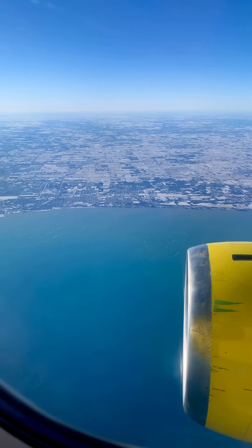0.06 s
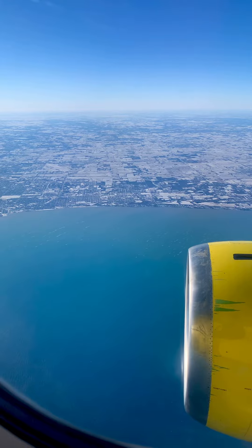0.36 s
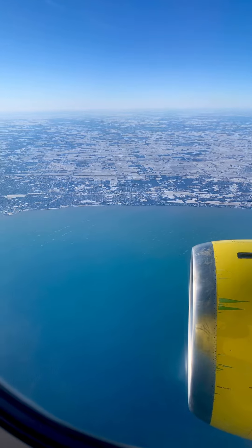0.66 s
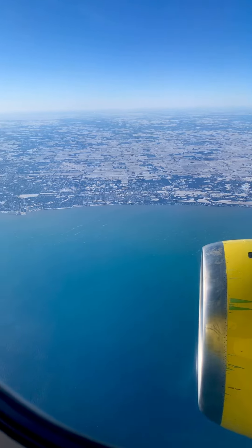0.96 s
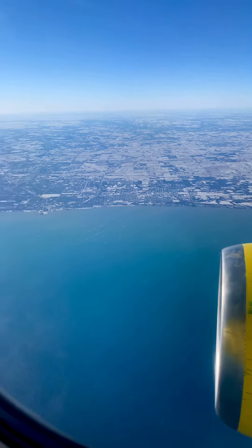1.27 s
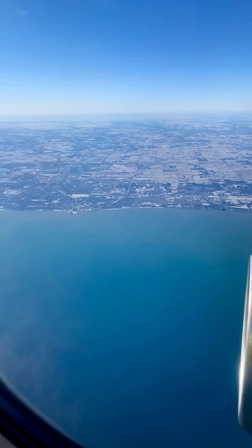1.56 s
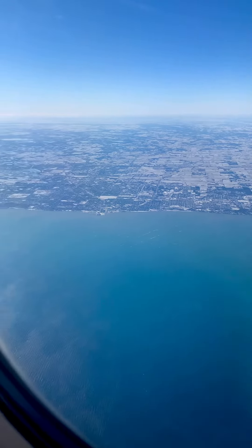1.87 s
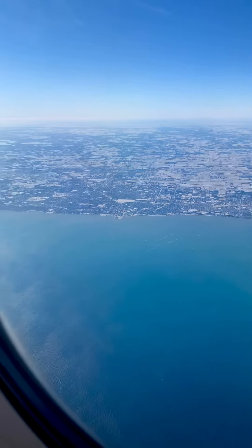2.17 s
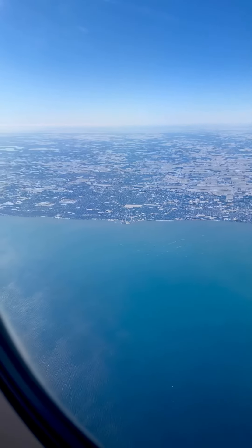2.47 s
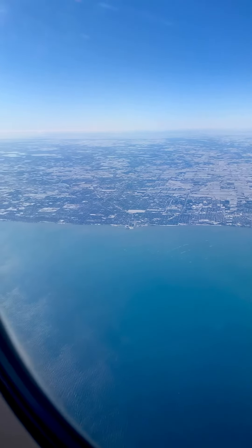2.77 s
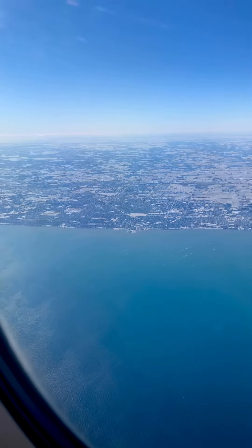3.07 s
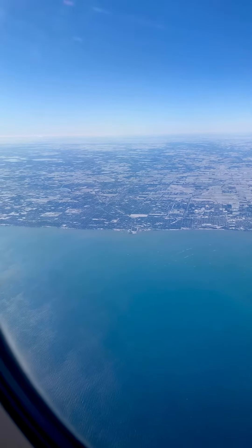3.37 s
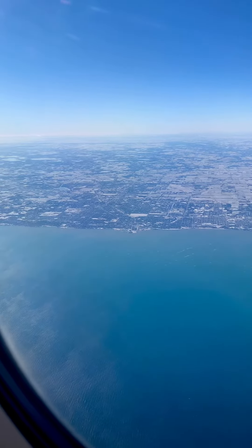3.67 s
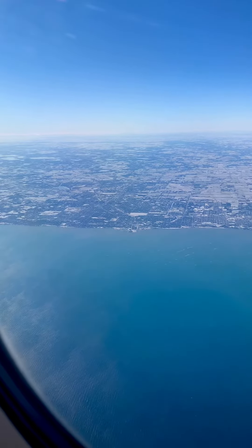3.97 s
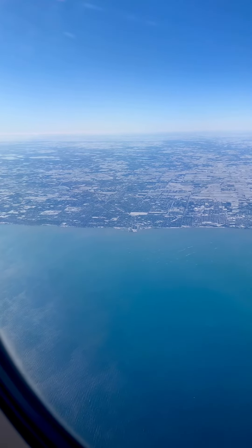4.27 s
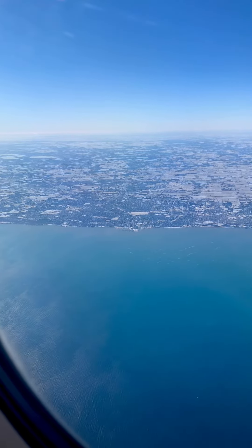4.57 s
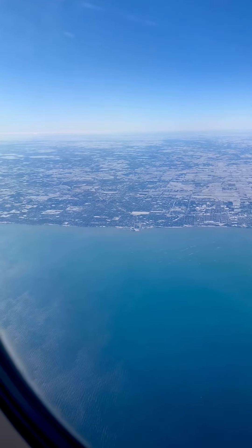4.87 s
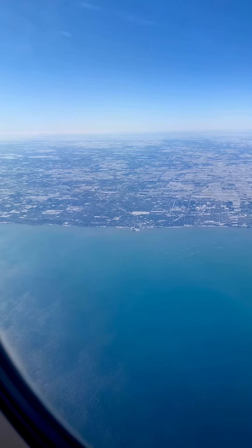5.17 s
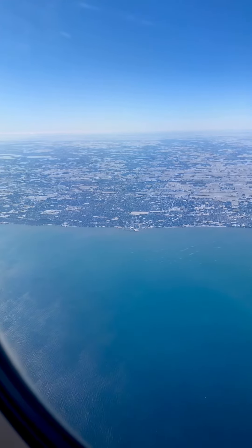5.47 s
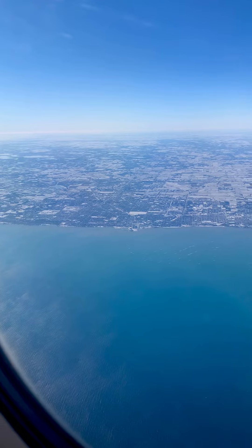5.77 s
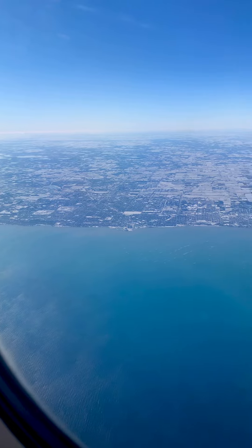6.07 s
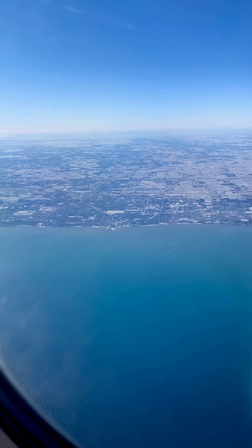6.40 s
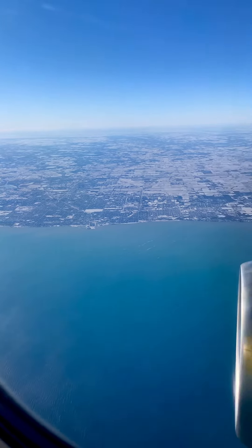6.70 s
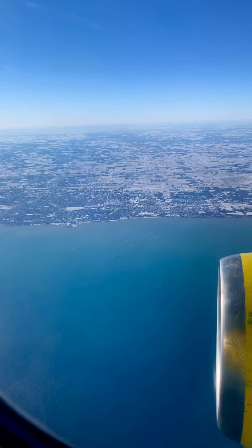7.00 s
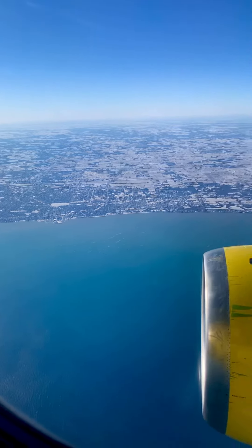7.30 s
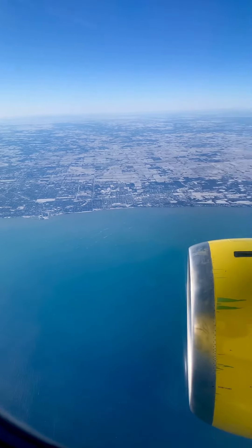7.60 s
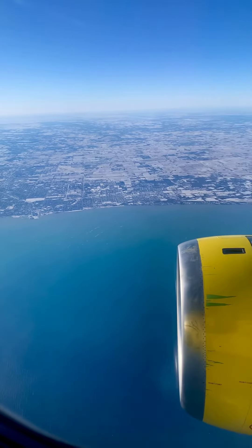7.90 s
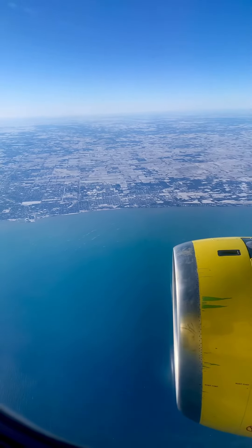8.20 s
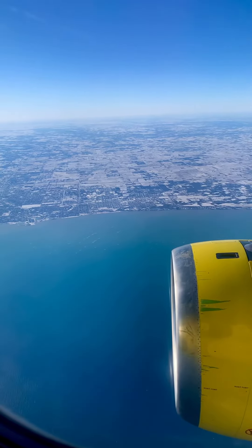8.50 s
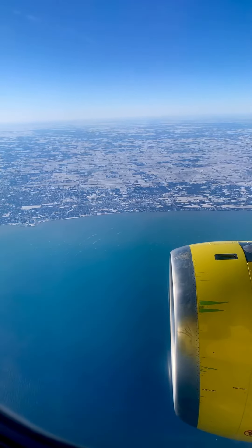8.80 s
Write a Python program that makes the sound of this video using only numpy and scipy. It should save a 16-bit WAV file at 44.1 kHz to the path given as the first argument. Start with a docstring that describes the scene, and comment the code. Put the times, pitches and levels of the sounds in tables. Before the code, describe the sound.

A steady low rumble and slowly pulsing engine hum fill an airliner in flight, under a thin whine and soft vent hiss.

```python
"""Window seat in a cruising airliner

Two engine fans spin at almost the same speed, so their tones beat (swell and fade): the low drone
slowly, the high blade whine fast. Air rumbles and rushes along the hull, the vents hiss, and something
rustles faintly nearby. It is all heard through the two microphones of a slowly turning phone."""
import sys
import numpy as np
from scipy import signal
from scipy.fft import rfft, irfft, next_fast_len
from scipy.io import wavfile
from scipy.ndimage import uniform_filter1d, minimum_filter1d, map_coordinates

SR = 44100
rng = np.random.default_rng(int(sys.argv[2]) if len(sys.argv) > 2 else 0)


def file_out(sig):
    """Save sig as 16-bit WAV at sys.argv[1]."""
    # one column per channel
    cols = np.atleast_2d(sig).T
    # limit, then scale
    lim = np.clip(cols, -1, 1)
    pcm = np.round(lim * 32767).astype(np.int16)
    wavfile.write(sys.argv[1], SR, pcm)


N = 390285
TIME_S = np.arange(N) / SR


# The engines' low tones. A harmonic is a multiple of the fan's spin rate; a lull is a beat's low point.
# Columns: harmonic, near_level_db, far_level_db, lull_s, left_lead_rad, left_louder_db
DRONE_TONES = [(1, -17.3, -28.1, 3.3, -.35, .4), (3, -36.5, -27.5, 6.75, .1, .5),
               (4, -27.6, -33.7, 4.55, .1, 3), (5, -19.4, -35.5, 3.35, -.6, .5)]

def drone(near, far, waver_db):
    """Both engines shake the hull with the same harmonics; the higher ones beat faster."""
    out = np.zeros((2, N))
    for harmonic, near_db, far_db, lull_s, lead, left_louder_db in DRONE_TONES:
        k = round(harmonic)
        slip = np.interp(lull_s, TIME_S, far - near)  # lines the fans up, so the tones oppose at lull_s
        phase = rng.uniform(0, 2 * np.pi)
        near_tone = tone(k * near + phase, lead)
        far_tone = amp(far_db - near_db) * tone(k * (far - slip) + phase, lead)
        waver = waver_db * np.sqrt(k) * wobble(5.8)  # shorter waves waver more
        balance = amp([[left_louder_db / 2], [-left_louder_db / 2]])
        out += (near_tone - far_tone) * balance * amp(near_db + waver)
    return out


# How much faster the far fan spins; it wanders as it is adjusted toward the near fan's speed.
# Columns: time_s, faster_hz
FAR_FAN_EXTRA_SPEED = [(0, .2), (.8, .18), (2.5, .163), (3.1, .122), (4, .11), (4.7, .147), (5.45, .1),
                       (5.9, .096), (6.45, .12), (7.1, .108), (7.5, .127), (8, .118), (8.85, .131)]

def fan_angles(spin_hz, slowing_hz_per_s):
    """How far the near and the far fan have turned, in radians, as both slow very slightly."""
    near_hz = spin_hz - slowing_hz_per_s * TIME_S
    far_hz = near_hz + curves(FAR_FAN_EXTRA_SPEED)[0]
    return 2 * np.pi * np.cumsum([near_hz, far_hz], axis=1) / SR


# Each engine's whine as it reaches the moving phone.
# Columns: time_s, left_db, right_db, left_lead_rad
NEAR_BLADE_TONE = [(.2, -46, -40.5, -1.45), (.8, -48, -40, -1.45), (1.25, -44.5, -44, .1),
                   (1.75, -40.5, -43, .8), (3, -37, -39, 1.2), (5.7, -35.5, -37.5, 1.55),
                   (6.3, -35.5, -40.5, 1.5), (7.25, -34.7, -52, 2.3), (7.75, -36, -52, 4.2),
                   (8.5, -36.5, -48.5, 4.3)]
FAR_BLADE_TONE = [(.2, -39.5, -42.5, 1.4), (1.2, -40, -42.5, 1.4), (1.8, -44.5, -44.5, .7),
                  (3.1, -43.5, -42.7, .7), (4.6, -44.3, -43, .8), (6.2, -41.3, -40.2, .8),
                  (7.2, -42.2, -38, 1.85), (8.8, -43.5, -39, 2.8)]

def blade_whine(near, far, blades, lull_s, waver_db):
    """Passing blades make two beating tones, each with its own pattern of loud spots in the cabin."""
    slip = np.interp(lull_s, TIME_S, far - near)
    near_angle = blades * near
    far_angle = blades * (far - slip) + np.pi  # opposite to the near tone at lull_s
    phase = rng.uniform(0, 2 * np.pi)
    out = np.zeros((2, N))
    for angle, heard in (near_angle, NEAR_BLADE_TONE), (far_angle, FAR_BLADE_TONE):
        left_db, right_db, lead = curves(heard)
        level_db = np.array([left_db, right_db]) + waver_db * wobble(8.2)
        out += tone(angle + phase, lead) * amp(level_db)
    return out


# The weak tones that make up the engines' buzz. Columns: harmonic, near_level_db, left_lead_rad
BUZZ_TONES = [(2, -33.5, -.9), (6, -36.3, -.3), (7, -42.5, 2.8), (8, -47.3, 1.2), (9, -50.5, -.6),
              (10, -50.5, 2.8), (12, -56, 2.7), (13, -46.3, -2.9), (15, -49.3, .5), (17, -55.5, 2.9),
              (18, -49.8, -1.3), (19, -49.3, -.7), (20, -55.3, 1.2), (21, -53.3, 1), (23, -57.8, 2.2),
              (24, -54.5, 2.5), (26, -57.2, 1.6), (27, -56.7, 2.3), (33, -64.3, 2), (34, -61.3, 1.8),
              (36, -66.5, .2), (38, -65.7, 1.1), (41, -65.6, 1.8), (44, -67.5, 1.2)]

def fan_buzz(near, far, far_gain_db, waver_db, blur_rad):
    """Unequal shock waves on the fan blades buzz; churning air on the way blurs the tones."""
    out = np.zeros((2, N))
    for harmonic, level_db, lead in BUZZ_TONES:
        k = round(harmonic)
        near_phase, far_phase = rng.uniform(0, 2 * np.pi, size=2)
        near_tone = tone(k * near + near_phase + blur_rad * wobble(14), lead)
        far_tone = tone(k * far + far_phase + blur_rad * wobble(13), lead)
        out += amp(level_db + waver_db * wobble(4.7)) * (near_tone + amp(far_gain_db) * far_tone)
    return out


# How strong the rumble is at each pitch. Columns: pitch_hz, relative_level_db
RUMBLE_SPECTRUM = [(15, -30.5), (30, -19), (42, -8.5), (57, 2.5), (76, -3), (100, 0), (150, -1.2),
                   (210, -3), (270, -4), (335, -3), (420, -7), (480, -4), (530, -11.5), (575, -31.5),
                   (900, -64.5)]

def hull_rumble(level_db):
    """Engine exhaust and the air dragging along the plane shake the hull."""
    return amp(level_db) * air_noise(RUMBLE_SPECTRUM, patchy_db=.3)


# How strong the rush is at each pitch. Columns: pitch_hz, relative_level_db
RUSH_SPECTRUM = [(300, -20.5), (560, 3.5), (680, 1.5), (820, 2.5), (920, 0), (1040, 1.5), (1250, -0.5),
                 (1380, -4.5), (1650, -7), (1830, -9.5), (2000, -11), (2400, -18), (3100, -20.5),
                 (4000, -22), (6000, -54)]

def air_rush(turned, start_db, rise_db_per_s, shaded_above_hz, turned_gain_db):
    """Air rushes along the hull and slowly swells; the phone's body shades the treble less when turned."""
    rush = air_noise(RUSH_SPECTRUM, patchy_db=1.8)
    treble = filtered(rush, lambda hz: 1 - flat_top(hz / shaded_above_hz))
    extra_treble = treble * (amp(turned_gain_db * turned) - 1)
    return amp(start_db + rise_db_per_s * TIME_S) * (rush + extra_treble)


# How strong the hiss is at each pitch. Columns: pitch_hz, relative_level_db
VENT_SPECTRUM = [(2000, -17.5), (4300, -8.5), (5200, 2), (6700, 6), (7800, 0), (8900, -3.5), (11000, -6.5),
                 (12500, -12.5), (15500, -16.5)]

def vent_hiss(turned, level_db, turned_gain_db, flicker_db):
    """Air hisses out of the vents, a little softer while the phone is turned away."""
    gain = amp(level_db + turned_gain_db * turned + flicker_db * wobble(16))
    return gain * air_noise(VENT_SPECTRUM, patchy_db=2.0)


# Faint rustles and ticks nearby. Columns: peak_s, level_db, pitch_hz, half_length_s
RUSTLE_PUFFS = [(.727, -51, 4800, .002), (.8045, -37.5, 3000, .002), (3.34, -57, 8430, 0.029),
                (4.612, -51, 4600, .003), (6.81, -57, 4600, .04), (8.253, -57, 9530, 0.044)]

def rustles(width_octaves):
    """Small, soft puffs of high noise; the shortest sound like ticks."""
    out = np.zeros(N)
    for peak_s, level_db, pitch_hz, half_length_s in RUSTLE_PUFFS:
        noise = rng.standard_normal(N)
        band = filtered(noise, lambda hz: bell(np.log2((hz + 1) / pitch_hz) / width_octaves))
        out += amp(level_db) * unit(band) * bell((TIME_S - peak_s) / half_length_s)
    return at_microphones(out)


def standing_wave(sound, turned_back, centre_hz, narrow_hz, wide_hz):
    """Near a standing wave's quiet spot, one band is weaker and the microphones hear it out of step."""
    narrow = filtered(sound, lambda hz: flat_top((hz - centre_hz) / narrow_hz))
    wide = filtered(sound, lambda hz: flat_top((hz - centre_hz) / wide_hz))
    wide_share = .55 * (1 - ease(start_s=.35, length_s=.7))  # the band narrows as the phone moves off
    band = narrow + wide_share * (wide - narrow)
    in_spot = 1 - ease(start_s=2.3, length_s=1.58)
    in_spot_rad, clear_rad = 2.85, -.37  # how far the right microphone is ahead of the left
    shift = np.outer([-.5, .5], clear_rad + (in_spot_rad - clear_rad) * in_spot)
    quarter_cycle_late = filtered(band, lambda hz: -1j)
    shifted = band * np.cos(shift) - quarter_cycle_late * np.sin(shift)
    band_db = -1 * in_spot - 2.2 * turned_back
    return sound - band + amp(band_db) * shifted


# How alike air noise is at the two microphones. Columns: pitch_hz, likeness (0 to 1)
MIC_LIKENESS = [(30, 0.79), (55, 0.99), (100, 1), (180, 0.89), (300, 0.89), (510, .8), (570, 0.075),
                (680, 0.22), (800, 0.43), (900, 0.33), (1000, 0.79), (1150, 0.12), (1500, 0.037),
                (1950, 0.63), (2900, 0.13), (4500, 1), (9000, 1), (14000, 0.92)]

def air_noise(spectrum, patchy_db):
    """Churning air: stereo noise of strength 1, with random louder and softer patches."""
    def shape(hz):
        split = np.arccos(np.clip(at_pitch(MIC_LIKENESS, hz), 0, 1)) / 2
        return amp(at_pitch(spectrum, hz)) * [np.cos(split), np.sin(split)]

    grid = signal.stft(rng.standard_normal((2, N)), nperseg=1024)[2]
    patches = uniform_filter1d(rng.standard_normal(grid.shape[1:]), size=6, axis=0)  # smooth over pitch
    patches = uniform_filter1d(patches, size=8, axis=1)  # and over time
    noise = signal.istft(grid * amp(patchy_db * unit(patches)), nperseg=1024)[1][:, :N]
    shared, opposed = filtered(noise, shape)
    return unit(at_microphones(np.array([shared + opposed, shared - opposed])))


# How far the left microphone is ahead of the right. Columns: pitch_hz, left_lead_rad
MIC_LEAD = [(60, -.1), (100, -.35), (170, -.45), (300, -.15), (510, -.75), (650, -2.5), (780, -2.8),
            (1050, -2.3), (1700, -4.1), (2400, -3.4), (3300, -4.7), (4700, -3.1), (6900, 0), (8900, 3.1),
            (11000, 6.3), (15000, 12.6)]

def at_microphones(sound):
    """Sound reaches one microphone slightly before the other."""
    return filtered(sound, lambda hz: np.exp(.5j * np.outer([1, -1], at_pitch(MIC_LEAD, hz))))


def tone(angle, lead):
    """A pure stereo tone of strength 1, with the left side ahead by lead radians."""
    return np.sqrt(2) * np.sin(angle + np.outer([.5, -.5], lead))


def amp(db):
    """Turn decibels into a gain to multiply by."""
    return 10 ** (np.asarray(db) / 20)


def unit(x):
    """Scale x to an average strength (rms) of 1."""
    return x / np.sqrt(np.mean(np.abs(x) ** 2) + 1e-20)


def at_pitch(table, hz):
    """Read a table of (pitch_hz, value) rows at any pitch, on a log scale."""
    pitches, values = np.transpose(table)
    return np.interp(np.log(hz + 1), np.log(pitches + 1), values)


def curves(table):
    """Turn each column after the time into one value per sample."""
    times, *columns = np.transpose(table)
    return [np.interp(TIME_S, times, column) for column in columns]


def wobble(rate_hz):
    """A smooth curve through rate_hz random values a second."""
    coarse = np.linspace(0, N, num=2000)
    values = rng.standard_normal(size=600)
    smooth = map_coordinates(values, [coarse * rate_hz / SR], mode="wrap")
    return np.interp(np.arange(N), coarse, smooth)


def ease(start_s, length_s):
    """A smooth move from 0 to 1."""
    return (1 - np.cos(np.pi * np.clip((TIME_S - start_s) / length_s, 0, 1))) / 2


def bell(x):
    """A rounded bump, highest at x = 0."""
    return np.exp(-x ** 2)


def flat_top(x):
    """Near 1 around x = 0, falling steeply through a half at -1 and 1."""
    return 1 / (1 + x ** 8)


def filtered(sound, response):
    """Multiply each pitch in the sound by response(hz)."""
    size = next_fast_len(N + SR // 2)
    hz = np.fft.rfftfreq(size, 1 / SR)
    return irfft(rfft(sound, size) * response(hz), size)[..., :N]


def scene():
    """Engines and air fill the cabin while the phone turns away from the engine and back."""
    near, far = fan_angles(spin_hz=78.57, slowing_hz_per_s=.009)
    turned_back = ease(start_s=6.4, length_s=2.2)
    turned = ease(start_s=.4, length_s=3.2) - turned_back
    engines = fan_buzz(near, far, far_gain_db=-8.5, waver_db=2.0, blur_rad=.33)
    engines += drone(near, far, waver_db=.1)
    engines += blade_whine(near, far, blades=22, lull_s=1.068, waver_db=.4)
    air = hull_rumble(level_db=-17)
    air += air_rush(turned, start_db=-31.5, rise_db_per_s=.21, shaded_above_hz=1400, turned_gain_db=2)
    air += vent_hiss(turned, level_db=-54, turned_gain_db=-.6, flicker_db=.21)
    cabin = standing_wave(engines + air, turned_back, centre_hz=222.0, narrow_hz=50.5, wide_hz=95)
    cabin += rustles(width_octaves=.43)
    return cabin * amp([[.2], [-.2]])  # a little louder on the left


def record(dry):
    """The phone's limiter eases down any peak over its ceiling, and the highest treble is cut off."""
    ceiling, top_hz = .91, 15800
    needed_gain = ceiling / np.maximum(np.abs(dry).max(axis=0), ceiling)
    smooth_gain = uniform_filter1d(minimum_filter1d(needed_gain, size=1201), size=1201)
    return filtered(dry * smooth_gain, lambda hz: hz < top_hz)


dry = scene()
out = record(dry)
file_out(out)
```